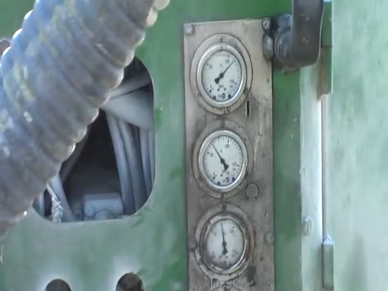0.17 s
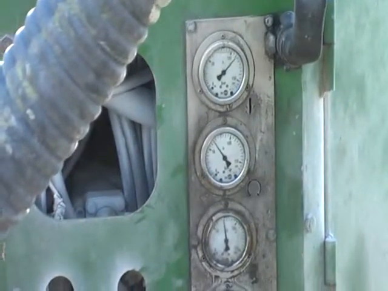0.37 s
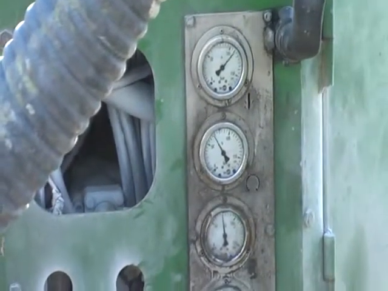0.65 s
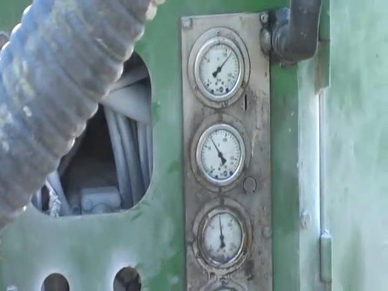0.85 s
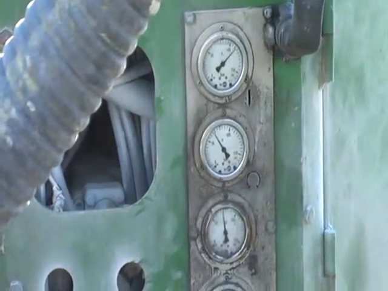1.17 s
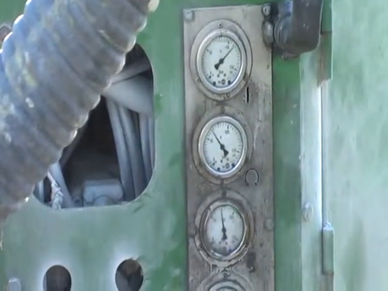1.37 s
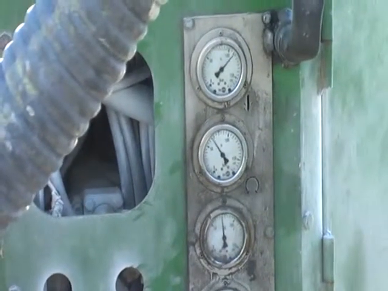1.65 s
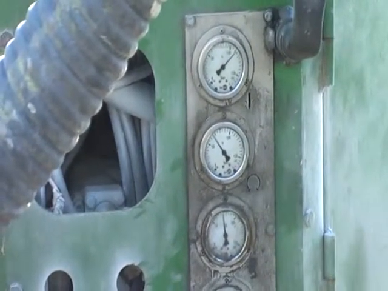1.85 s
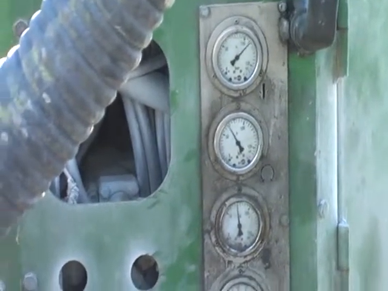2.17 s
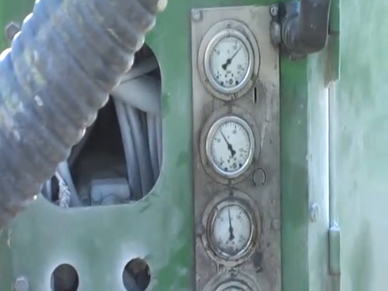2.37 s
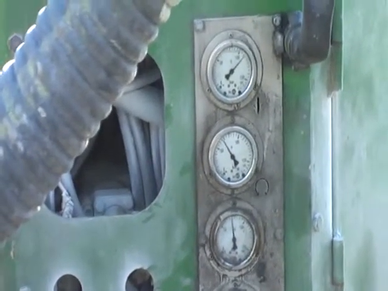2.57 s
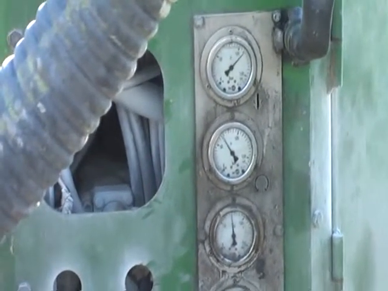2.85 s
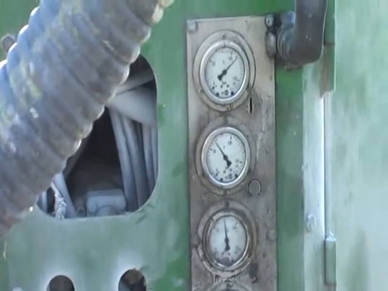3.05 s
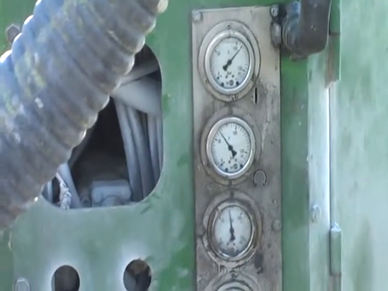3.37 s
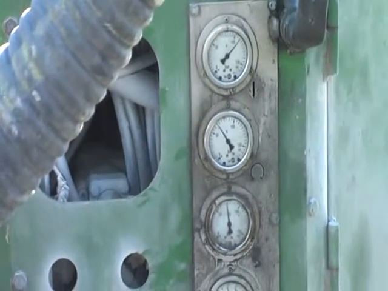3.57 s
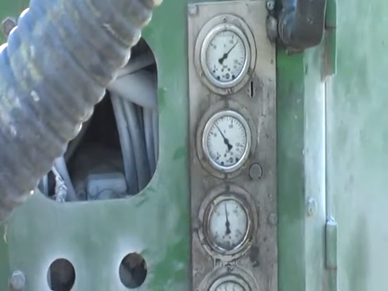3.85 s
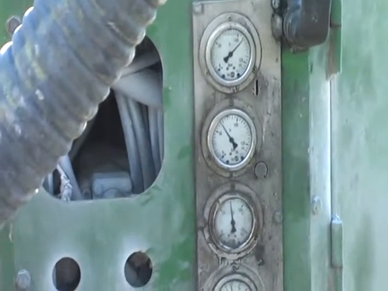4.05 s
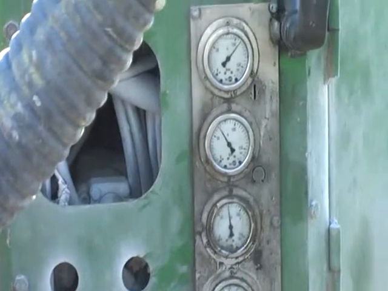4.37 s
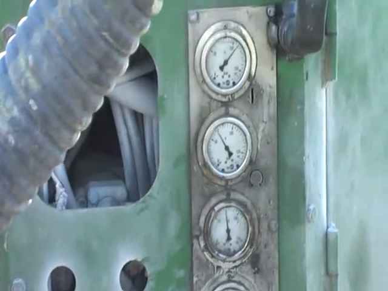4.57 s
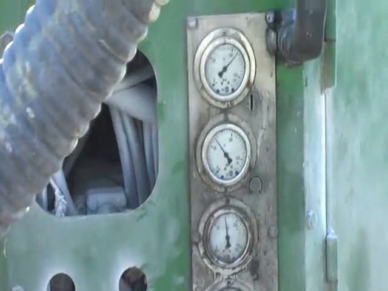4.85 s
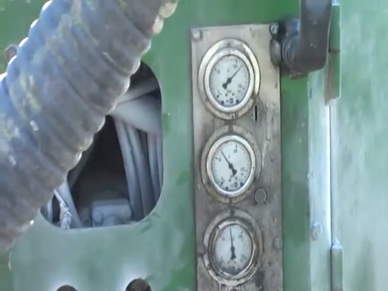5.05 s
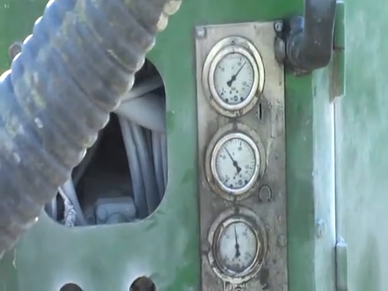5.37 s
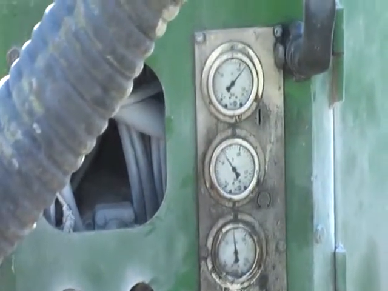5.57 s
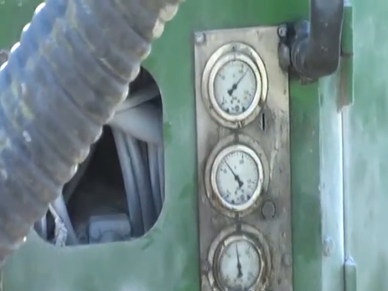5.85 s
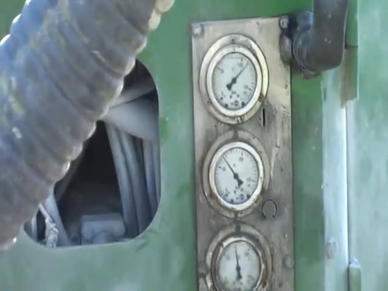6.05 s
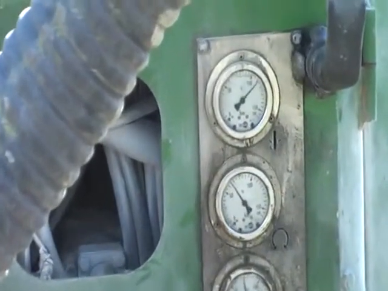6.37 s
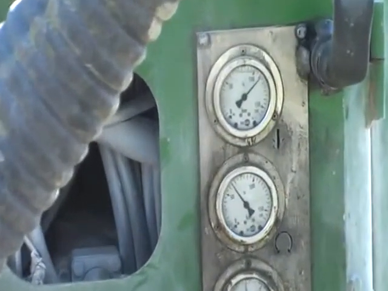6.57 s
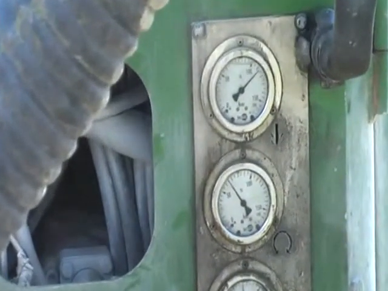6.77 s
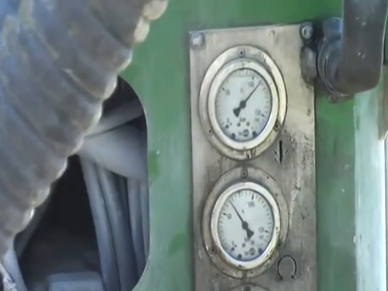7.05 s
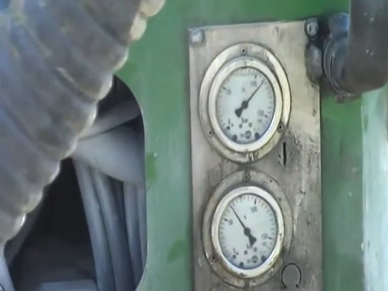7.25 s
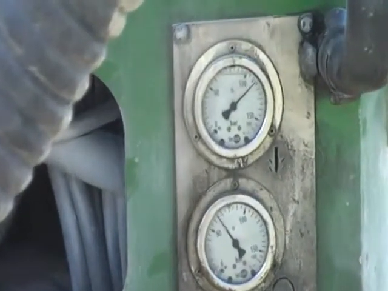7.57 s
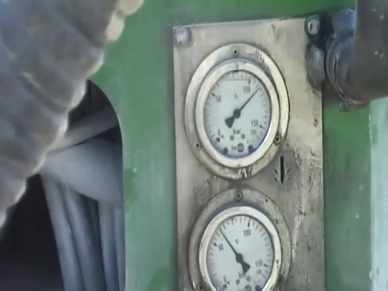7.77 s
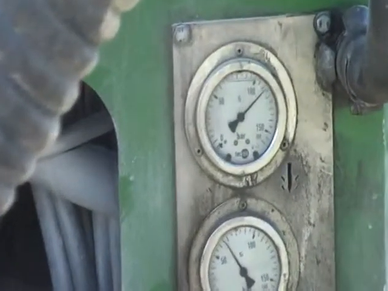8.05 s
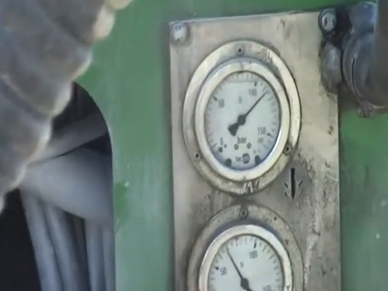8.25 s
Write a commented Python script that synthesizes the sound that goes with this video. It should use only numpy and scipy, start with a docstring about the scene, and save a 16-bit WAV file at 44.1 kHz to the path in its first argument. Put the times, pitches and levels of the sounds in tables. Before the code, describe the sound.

Loud, steady machine-gun-fast drilling clatter beside a rig, ringing steel and gritty rattle fused into one rough buzz, with faint low bumps underneath.

```python
"""A hydraulic rock drill hammers about 80 times a second, heard from beside the rig's gauge panel.
Each blow shakes uneven noise into the modes of drill steel and rig panels and into a dense clatter of housing and bit.
Underneath: broad roar of engine, fan and flushing air (shaped noise), hum (near sines), faint low bumps (pulses).
A small stereo microphone with a bass cut stands close; direct and diffuse sound are mixed to two ports."""
import sys
import numpy as np
from scipy import signal
from scipy.fft import rfft, irfft
from scipy.io import wavfile

SR = 44100
rng = np.random.default_rng(int(sys.argv[2]) if len(sys.argv) > 2 else 0)


def int16_out(signal):
    """Quantize to a 16-bit WAV file."""
    q = np.round(np.clip(np.atleast_2d(signal).T, -1, 1) * 32767)
    wavfile.write(sys.argv[1], SR, q.astype(np.int16))


N = 370440

# hum of engine and pumps, before the bass cut: f/Hz, level/dB rms
HUM_LINES = [(184, -63), (224.1, -56)]
# engine, fan and air, relative spectrum: f/Hz, level/dB per Hz
ROAR_SPECTRUM = [(60, 9), (150, -2), (300, -7), (600, -4), (1300, -2), (1900, -1), (2500, 0.5), (4500, 0.5),
                 (8000, -9.5), (11000, -6), (15800, -11.5)]
# clearest low bumps, level before each splits into two pulses: t/s, left level/dB peak, right level/dB peak
CLEAR_BUMPS = [(0.139, -18, -29), (0.42, -27, -25), (1.054, -20, -29), (1.381, -23, -60), (1.808, -23, -60),
               (2.084, -19, -60), (2.365, -24, -46), (2.654, -25, -21), (2.814, -21, -60),
               (3.167, -60, -25), (3.667, -22, -34), (3.914, -24, -60), (4.09, -22, -26), (4.165, -34, -26),
               (4.736, -21, -36), (5.276, -23, -60), (5.891, -24, -60), (6.463, -24, -60), (6.85, -28, -60),
               (6.949, -24, -36), (7.195, -23, -30), (7.403, -20, -60), (7.884, -60, -29),
               (8.087, -60, -26), (8.284, -25, -25)]
# piston behind its even beat: t/s, lateness/ms
PISTON_LATENESS = [(0.0, -2.2), (0.5, 2.0), (0.62, -0.3), (0.9, -0.3), (1.47, -3.0), (1.68, 2.3),
                   (2.07, -0.7), (2.6, 1.9), (2.92, -6.7), (4.1, -7.2), (4.4, -5.6), (4.9, -5.0),
                   (5.3, -2.0), (5.6, -4.5), (5.8, -0.9), (6.2, -8.5), (6.55, -11.0), (6.7, -9.5),
                   (7.35, -12.3), (7.5, -15.5), (7.72, -11.5), (8.4, -11.8)]
# blow strength: t/s, level/dB
BLOW_STRENGTH = [(0.0, -17), (0.07, -15.2), (0.63, -16), (6.18, -16), (6.25, -14.5), (6.41, -18.5),
                 (6.48, -16), (7.27, -16), (7.39, -14.5), (7.44, -16.5), (8.4, -15.5)]
# bending modes of the drill steel, spreading apart with pitch: f/Hz, width per stage/Hz, relative level/dB
STEEL_MODES = [(2260, 270, -5.2), (2520, 300, -5.2), (2885, 300, -3.8), (3300, 300, -5.9),
               (3854, 300, -2.9), (4225, 290, -1.7), (4953, 280, -2.1), (5280, 300, -2.7),
               (5725, 230, -0.8), (6155, 200, 0.0), (6650, 300, -2.8), (7127, 250, -3.6), (7545, 270, -6.3),
               (8096, 240, -2.1), (8575, 170, -1.2), (9065, 190, -3.1), (9582, 170, -4.0),
               (10142, 240, -6.5), (10670, 220, -7.9), (11215, 230, -6.7), (11779, 250, -9.7),
               (12317, 300, -13.1), (12877, 290, -13.5), (13480, 300, -14.8), (14018, 280, -16.2),
               (14600, 300, -17.4), (15220, 300, -18.1), (15680, 230, -24.3)]
# panels and frame of the rig: f/Hz, width per stage/Hz, relative level/dB
PANEL_MODES = [(241, 27, -6.4), (324, 38, -6.1), (350, 43, -5.8), (385, 54, -10.6), (495, 65, -6.2),
               (565, 65, -9.3), (638, 65, -6.9), (742, 48, -9.1), (800, 86, -10.3), (858, 48, -5.8),
               (965, 86, -6.0), (1110, 86, -7.8), (1170, 86, -6.7), (1220, 48, -0.4), (1285, 52, -3.2),
               (1320, 59, 0.0), (1435, 113, -6.5), (1570, 140, -10.3), (1700, 150, -9.0), (1960, 150, -7.7)]
# modes whose level changes: f/Hz
CHANGING_MODES_HZ = [350, 858, 1320, 2520, 2885, 7545, 8096, 8575]
# for each of them, creep as the microphone drifts nearer, and swing: mean/dB, creep/(dB/s), swing/dB
MODE_CHANGES = [(0.6, 0.3, -0.5), (1.0, 0.9, -0.5), (2, -0.6, 0), (0.6, 0.06, 0.5), (-1, 0.62, 0),
                (-7, -0.5, -9), (2, 0.2, 2), (2.2, -0.15, -0.7)]
# housing and bit on rock, too many modes to tell apart: f/Hz, relative level/dB per Hz
CLATTER_SPECTRUM = [(200, -49), (450, -5.5), (700, -13), (1050, -10), (1270, -0.5), (1550, -14),
                    (2000, -6.5), (2400, -8), (4500, -3), (7000, -2.5), (9300, -4), (10500, -5),
                    (13000, -10), (15800, -22)]
# diffuse against direct sound: f/Hz, level/dB
DIFFUSE_SHARE = [(130, -11), (300, -15), (640, -13), (1400, -11.5), (3100, -9), (6800, -9), (9500, -8.5),
                 (15000, -6)]
# left port over right port: f/Hz, level/dB
LEFT_TILT = [(60, 6), (130, 2.5), (290, 0.0), (640, 0.5), (1410, -0.5), (3100, -2.0), (6820, -2),
             (15000, 1.5)]
# phase lead of the left port: f/Hz, lead/rad
LEFT_PHASE = [(200, 0.084), (3270, -0.42), (9650, -0.38), (11800, -1.06), (14000, -1.7), (15500, -0.77)]

BLOWS_PER_S = 79.8
STEEL_DB, CLATTER_DB, PANELS_DB, ROAR_DB = -2, -4.5, -12.5, -23.5
SWING_PERIOD_S, SWING_TOP_S = 3.8, 3.15
SMALL_BUMP_COUNT, SMALL_BUMP_DB, SMALL_BUMP_LEFT_SHARE = 26, -28, 0.65
CUTOFF_HZ = 15700


def from_db(db):
    """Amplitude gain of a level in dB."""
    return 10 ** (np.asarray(db) / 20)


def rms_one(x):
    """Scale to rms 1."""
    return x / np.sqrt(np.mean(x ** 2) + 1e-20)


def in_time(rows):
    """Interpolate a (t/s, value) table to every sample."""
    t_s, value = np.transpose(rows)
    return np.interp(np.arange(N) / SR, t_s, value)


def at_hz(points, f_hz):
    """Read a (f/Hz, value) table on a log axis."""
    table_hz, value = np.transpose(points)
    return np.interp(np.log(f_hz + 1), np.log(table_hz + 1), value)


def drift(rate_hz):
    """Slow random curve of rms 1: noise at every 40th sample through a double one-pole low-pass."""
    r = np.exp(-80 * np.pi * rate_hz / SR)
    noise = rng.standard_normal(N // 40 + 4002)
    slow = signal.lfilter([1], [1, -2 * r, r * r], noise)[4000:]   # start-up dropped
    return np.interp(np.arange(N) / 40, np.arange(len(slow)), rms_one(slow))


def coloured(x, spectrum):
    """Shape by a smooth spectrum; rms 1."""
    gain = from_db(at_hz(spectrum, np.fft.rfftfreq(N, 1 / SR)))
    return rms_one(irfft(rfft(x) * gain, N))


def hum():
    """Engine and pumps: near sines whose phase wanders a little."""
    t_s = np.arange(N) / SR
    total = 0
    for f_hz, level_db in HUM_LINES:
        phase_rad = 2 * np.pi * f_hz * t_s + 0.79 * drift(2.8)
        total = total + np.sqrt(2) * from_db(level_db) * np.sin(phase_rad)
    return total


def roar():
    """Engine, fan and air: smooth broad noise, wavering slightly; rows: direct, diffuse."""
    level_db = ROAR_DB + 1.64 * drift(10.5)
    return from_db(level_db) * coloured(rng.standard_normal((2, N)), ROAR_SPECTRUM)


def small_bumps():
    """Weaker bumps at random moments, one side each; columns as in CLEAR_BUMPS."""
    when, side = rng.random((SMALL_BUMP_COUNT, 2)).T
    t_s = (0.01 + 0.98 * when) * N / SR
    left = side < SMALL_BUMP_LEFT_SHARE
    return np.c_[t_s, np.where(left, SMALL_BUMP_DB, -60), np.where(left, -60, SMALL_BUMP_DB)]


def bumps(low_hz, high_hz, early_ms):
    """Dull pulses of either sign: clicks through a deeper and a thinner band-pass in random shares."""
    t_s, *peak_db = np.vstack([CLEAR_BUMPS, small_bumps()]).T
    deep_share, sign_draw = rng.random((2, len(t_s)))
    sign = np.sign(sign_draw - 0.5)
    at = ((t_s - early_ms / 1000) * SR).astype(int)
    out = 0
    for share, edge_hz in zip([deep_share, 1 - deep_share], low_hz):
        sos = signal.butter(2, [edge_hz, high_hz], "band", fs=SR, output="sos")
        clicks = np.zeros((2, N))
        clicks[:, at] = from_db(peak_db) * share * sign
        pulse_peak = signal.sosfilt(sos, signal.unit_impulse(2000)).max()
        out = out + signal.sosfilt(sos, clicks + 1e-18) / pulse_peak
    return out


def blow_number(lead_ms):
    """Running count of piston blows; a blow lands lead_ms before its rattle is loudest."""
    t_s = np.arange(N) / SR - (in_time(PISTON_LATENESS) - lead_ms) / 1000
    return 2 + BLOWS_PER_S * t_s


def bursts(count, size, peak_ms, rest_db):
    """Shaking swells after each blow and dies towards a rest level."""
    blow = count.astype(int)
    period_ms = 1000 / BLOWS_PER_S
    since_ms = (count - blow) * period_ms

    def swell(ms):
        """Rise and decay of one blow, highest at peak_ms."""
        return (ms / peak_ms * np.exp(-ms / peak_ms)) ** 2

    # the tail of the blow before runs on under the new one
    shape = size[blow] * swell(since_ms) + size[blow - 1] * swell(since_ms + period_ms)
    return rms_one(shape) + from_db(rest_db)


def grit(spread_db):
    """Noise of uneven grains from chips and loose joints; rows: direct, diffuse."""
    grain_db = spread_db * np.minimum(rng.exponential(1, N), 5)
    return from_db(grain_db) * rng.standard_normal((2, N))


def thuds(count, size, jitter_ms, soft_hz):
    """One dull push a blow, of the same shape each time: it gives the low modes their pitch."""
    at = np.flatnonzero(np.diff(count.astype(int)) > 0) + 1
    jitter = jitter_ms / 1000 * SR * rng.standard_normal(len(at))
    landed = np.clip(at + jitter, 0, N - 1).astype(int)
    clicks = np.zeros(N)
    clicks[landed] = size[count[at].astype(int)]
    return signal.sosfilt(signal.butter(1, soft_hz, fs=SR, output="sos"), rms_one(clicks) + 1e-18)


def resonance(x, f_hz, width_hz):
    """Two-pole band-pass applied twice for steep skirts; width per stage, gain 1 on top."""
    r = np.exp(-np.pi * width_hz / SR)
    stage = [(1 - r * r) / 2, 0, (r * r - 1) / 2, 1, -2 * r * np.cos(2 * np.pi * f_hz / SR), r * r]
    return signal.sosfilt([stage, stage], x)


def ringing(shake, count, modes, scatter_db, sway_db):
    """Each blow drives every mode with its own strength; every mode's level also wavers slowly at random."""
    blow, t_s = count.astype(int), np.arange(N) / SR
    swing = np.cos(2 * np.pi * (t_s - SWING_TOP_S) / SWING_PERIOD_S)
    changes = dict(zip(CHANGING_MODES_HZ, MODE_CHANGES))
    out = 0
    for k, (f_hz, width_hz, level_db) in enumerate(modes):
        scatter = scatter_db * rng.standard_normal(blow.max() + 1)
        gain_db = level_db + scatter[blow] + sway_db * drift(0.19)
        mean_db, creep_db_per_s, swing_db = changes.get(f_hz, (0, 0, 0))
        gain_db = gain_db + mean_db + creep_db_per_s * (t_s - t_s.mean()) + swing_db * swing
        sign = (-1) ** k   # neighbours cancel between peaks
        out = out + sign * resonance(shake * from_db(gain_db), f_hz, width_hz)
    return rms_one(out)


def hammer():
    """Steel and housing under the same blows at one lead; panels and thuds each at another."""
    size = from_db(2.0 * rng.standard_normal(int(BLOWS_PER_S * N / SR) + 9))   # no two blows alike
    count = blow_number(lead_ms=6.1)
    burst = bursts(count, size, peak_ms=4.55, rest_db=-5)
    steel = ringing(burst * grit(1.84), count, STEEL_MODES, scatter_db=2.0, sway_db=1.7)
    clatter = coloured(burst * grit(2.35), CLATTER_SPECTRUM)

    count = blow_number(lead_ms=8.36)
    size = size ** 0.37   # the heavy frame evens the blows out
    shake = rms_one(bursts(count, size, peak_ms=3.04, rest_db=-1.5) * grit(1.5))
    # thuds in the direct row only
    shake[0] += from_db(0.5) * thuds(blow_number(lead_ms=4.99), size, jitter_ms=0.52, soft_hz=706)
    panels = ringing(shake, count, PANEL_MODES, scatter_db=0.5, sway_db=0.5)

    parts = from_db(STEEL_DB) * steel + from_db(CLATTER_DB) * clatter + from_db(PANELS_DB) * panels
    return from_db(in_time(BLOW_STRENGTH)) * parts


def scene():
    """Direct sound reaches both ports with a small lead and tilt; the diffuse part differs between them."""
    f_hz = np.fft.rfftfreq(N, 1 / SR)
    hum_rows = hum() * [[1], [0]]   # direct only
    direct, diffuse = rfft(hammer() + roar() + hum_rows)
    diffuse = diffuse * from_db(at_hz(DIFFUSE_SHARE, f_hz))
    # half the tilt and lead on each port, opposite ways
    turn = from_db(at_hz(LEFT_TILT, f_hz) / 2) * np.exp(0.5j * at_hz(LEFT_PHASE, f_hz))
    ports = irfft(np.array([(direct + diffuse) * turn, (direct - diffuse) / turn]), N)
    bass_cut = signal.butter(6, 190, "high", fs=SR, output="sos")
    ports = signal.sosfilt(bass_cut, ports)
    return ports + bumps(low_hz=[45, 110], high_hz=244, early_ms=3.96)   # bumps bypass the bass cut


def record(dry):
    """Round the peaks by tanh, then cut the top with a steep low-pass."""
    rounded = 1.1 * np.tanh(dry / 1.1)
    return signal.sosfilt(signal.ellip(12, 0.5, 75, CUTOFF_HZ, fs=SR, output="sos"), rounded)


dry = scene()
out = record(dry)
int16_out(out)
```